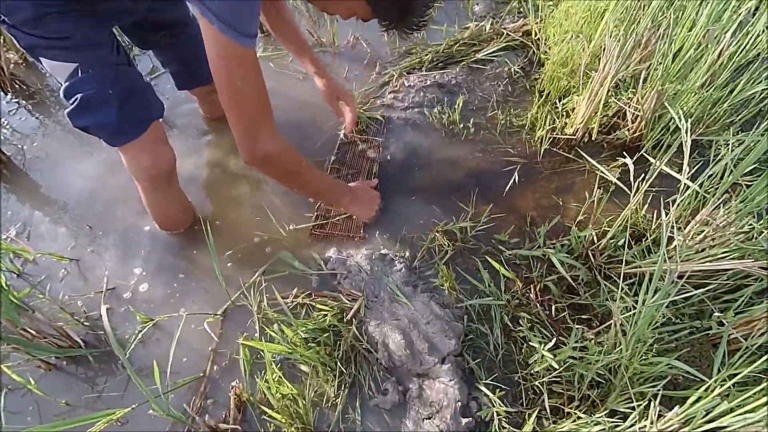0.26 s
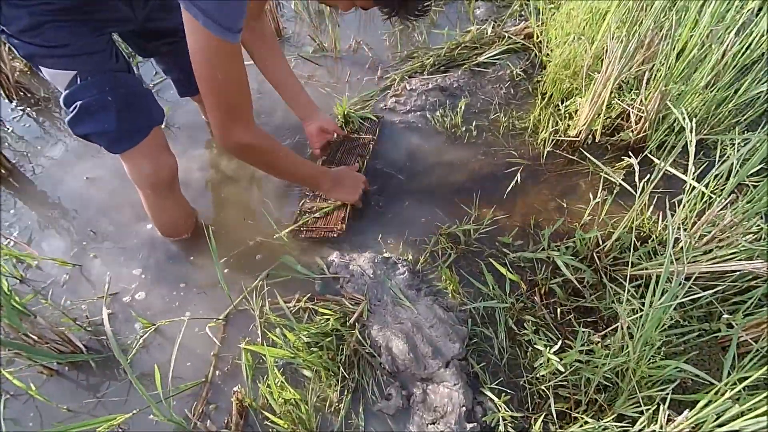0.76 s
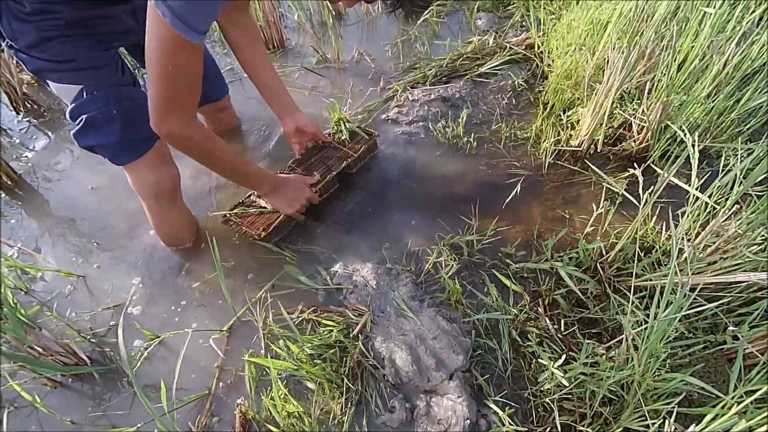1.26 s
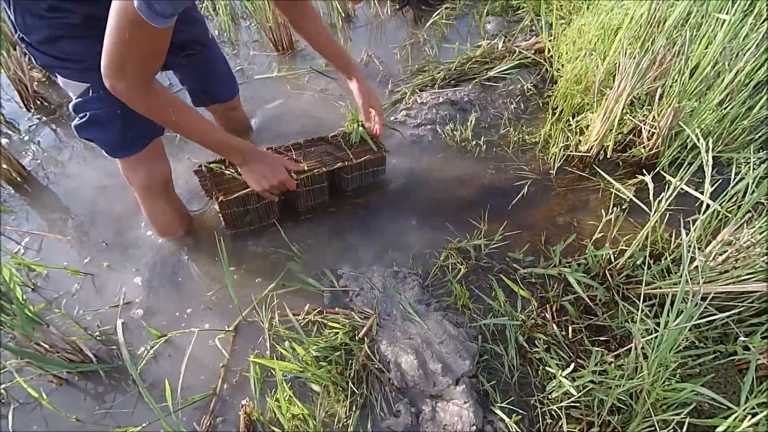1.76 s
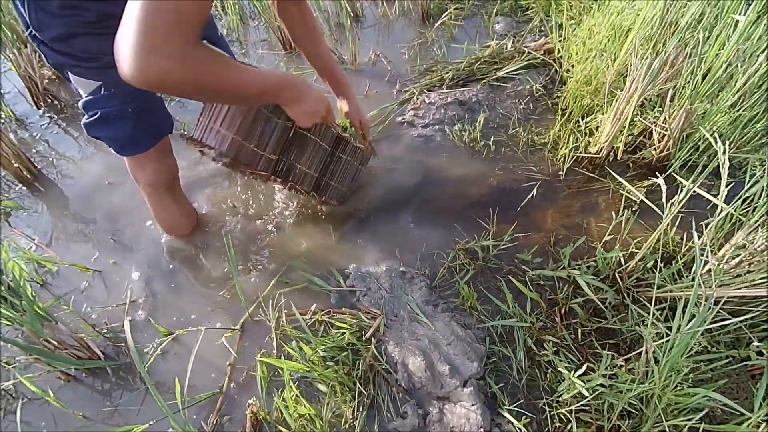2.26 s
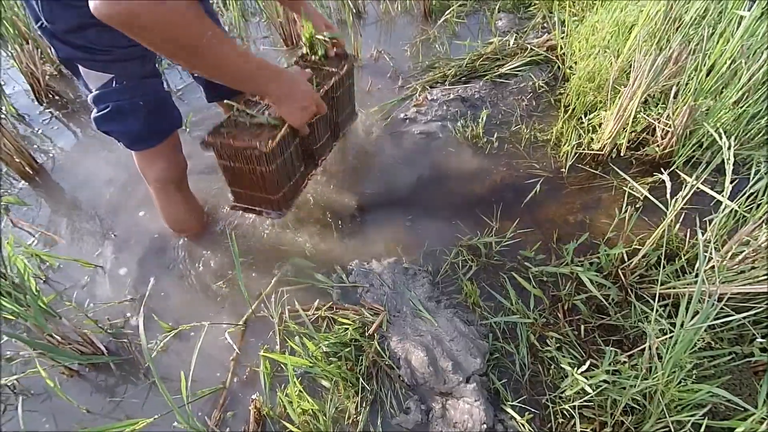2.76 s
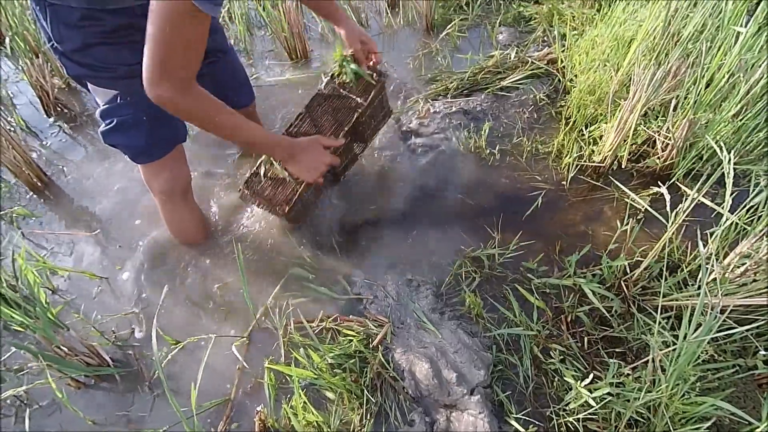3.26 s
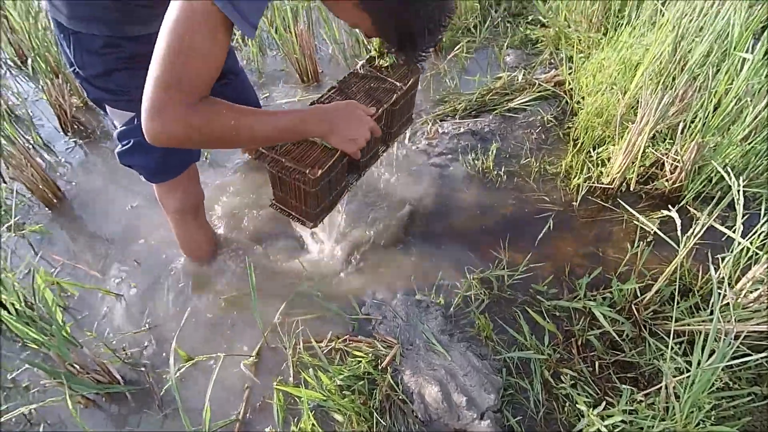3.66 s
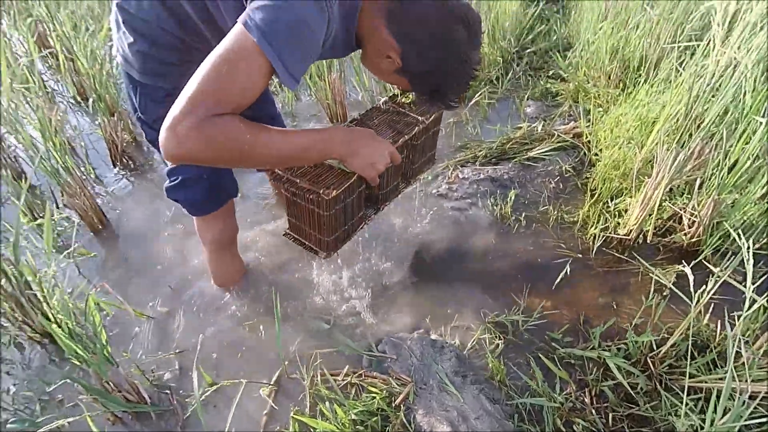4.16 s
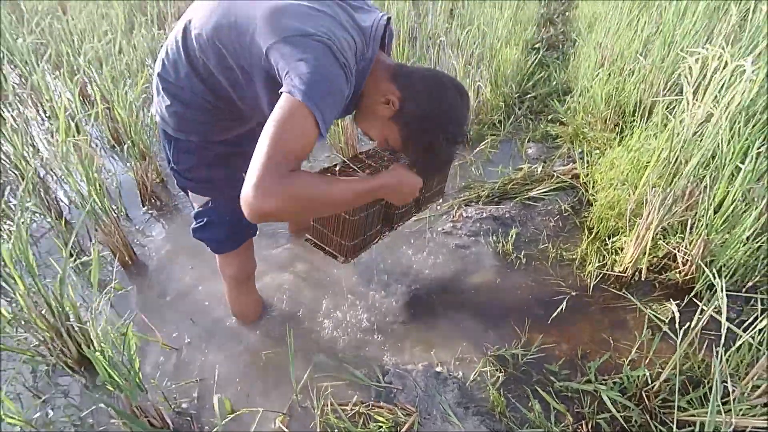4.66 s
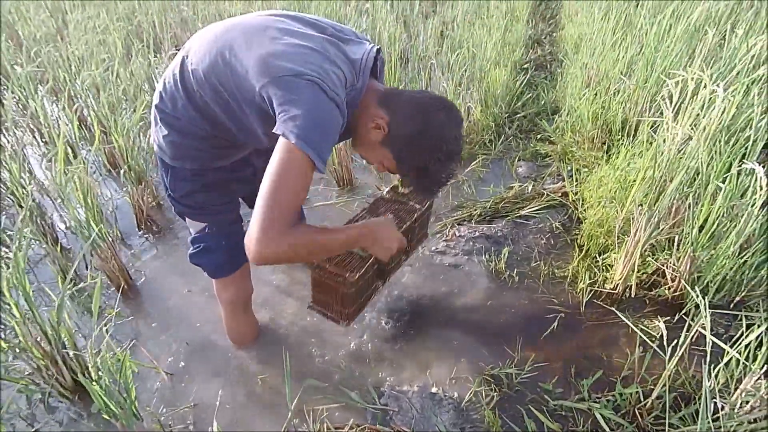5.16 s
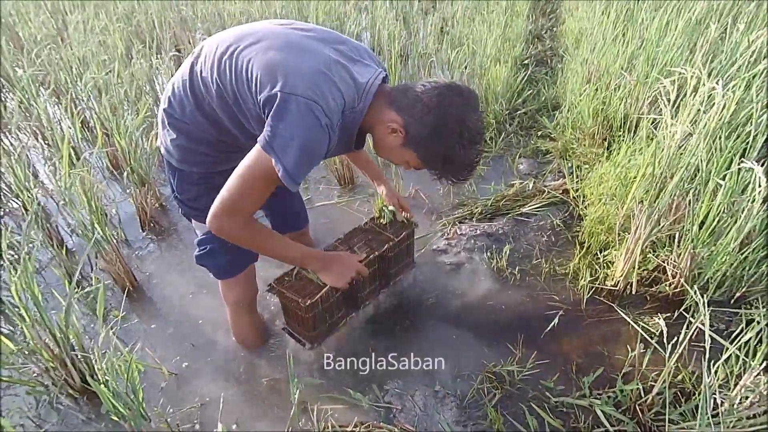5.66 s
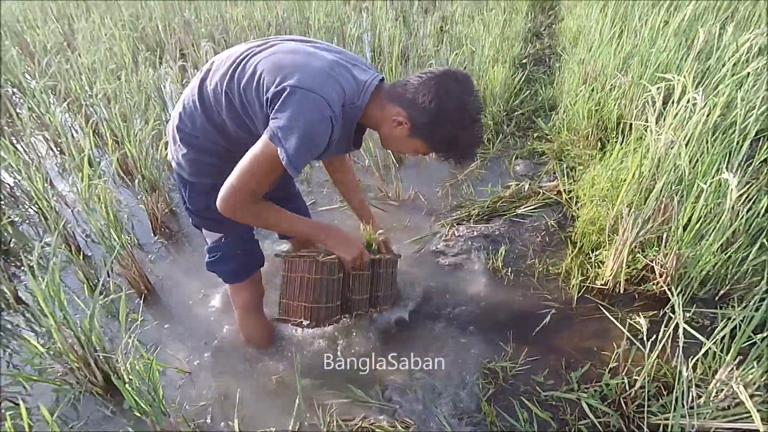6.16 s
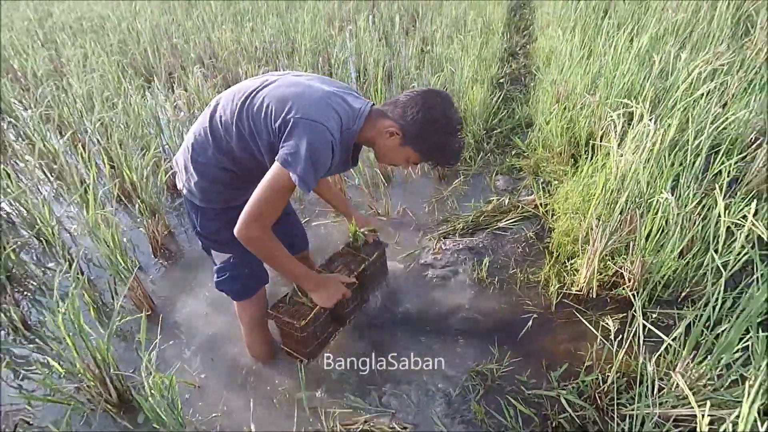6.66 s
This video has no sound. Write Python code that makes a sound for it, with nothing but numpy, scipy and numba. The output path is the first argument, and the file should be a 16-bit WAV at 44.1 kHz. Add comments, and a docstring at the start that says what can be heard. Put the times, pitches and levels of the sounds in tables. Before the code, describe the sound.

Faint insects and hiss lie under lumpy wind rumble on the microphone. Small birds whistle and trill briefly near the start and again just before two seconds. Water then breaks open with a splash, surges at about three seconds, drains in separate hollow drips, and is churned again from five and a half seconds with sharp splashes, plops and gushing, close and dry in an open field.

```python
"""Shallow paddy water: a slatted bamboo trap is lifted out, drains, and is dunked again.
Water gushes, gurgles and drips through the slats: swarms of damped bubble sines over washes of noise.
Wind rumbles on the microphone as low noise; small birds call nearby as gliding sines with faint echoes.
Insects sing faintly over the field as a narrow band of noise above a soft hiss."""
import sys
import numpy as np
from scipy import signal
from scipy.fft import rfft, irfft
from scipy.io import wavfile
from numba import njit

SR = 44100
rng = np.random.default_rng(int(sys.argv[2]) if len(sys.argv) > 2 else 0)


def waveform_to_disk(signal):
    """Save audio, clipped to [-1, 1], as 16-bit WAV at the path in sys.argv[1]."""
    frames = np.transpose(np.atleast_2d(signal))
    scaled = np.clip(frames, -1, 1) * 32767
    samples = np.round(scaled).astype(np.int16)
    wavfile.write(sys.argv[1], SR, samples)


N = 305613


def from_db(db):
    """Decibel law: 20 dB is a tenfold amplitude."""
    return 10 ** (np.asarray(db) / 20)


def rms_one(x):
    """Normalisation of signal power: scale to unit rms."""
    return x / np.sqrt(np.mean(x ** 2) + 1e-20)


def in_time(rows):
    """Linear interpolation: a table's columns at every sample, 40 lower before its first row."""
    times, *columns = np.transpose(rows)
    return [np.interp(np.arange(N) / SR, times, c, left=c[0] - 40) for c in columns]


def at_hz(points, hz):
    """Interpolation of a spectrum's level [dB] along a logarithmic frequency axis."""
    point_hz, point_db = np.array(points).T
    return np.interp(np.log(hz), np.log(point_hz), point_db)


def drift(corner_hz):
    """Low-pass filtered chance: a slow random curve of unit rms, made at SR / 20 by a double pole."""
    pole = np.exp(-40 * np.pi * corner_hz / SR)
    noise = rng.standard_normal(N // 20 + 2002)
    slow = signal.lfilter([1], [1, -2 * pole, pole * pole], noise)[2000:]
    return np.interp(np.arange(N) / 20, np.arange(len(slow)), rms_one(slow))


def butterworth(order, hz, kind, x):
    """Maximally flat filtering of a signal."""
    return signal.sosfilt(signal.butter(order, hz, kind, fs=SR, output="sos"), x)


def coloured(x, spectrum):
    """Spectral shaping: weight each frequency by the spectrum, held above 14.8 kHz; unit rms."""
    hz = np.clip(np.fft.rfftfreq(N, 1 / SR), 1, 14800)
    return rms_one(irfft(rfft(x) * from_db(at_hz(spectrum, hz)), N))


@njit
def add(out, start, hz, height, t60, rise, rate):
    """Bubble resonance: each is a damped sine whose pitch climbs as it nears the surface."""
    # `rise` is the fractional climb in pitch over one t60
    for k in range(len(start)):
        phase, length = 0.0, int(t60[k] * rate * .7)
        for i in range(min(length, len(out) - start[k])):
            age = i / (t60[k] * rate)
            phase += 2 * np.pi * hz[k] * (1 + rise[k] * age) / rate
            decay = np.exp(-6.9 * age)
            onset = min(1.0, .5 * i * hz[k] / rate)   # two cycles to full height
            out[start[k] + i] += height[k] * np.sin(phase) * decay * onset


def swarm(per_s, spectrum, cycles, spread_db, clump_db, rise):
    """Random superposition: clumped bubbles, pitches even in log frequency, few loud; unit rms."""
    draws = rng.random((N, 5))
    clumps = from_db(clump_db * drift(25))
    born = draws[:, 0] < per_s * clumps / clumps.mean() / SR
    _, pitch, size, life, climb = draws[born].T
    low_hz, high_hz = spectrum[0][0], spectrum[-1][0]
    hz = low_hz * (high_hz / low_hz) ** pitch
    t60 = cycles * 1.64 ** (2 * life - 1) / hz
    spreads = np.minimum(-np.log(size + 1e-9), 3.6)   # caps the loudest bubbles
    # short high bubbles must be taller to carry the same power per Hz
    height = from_db(at_hz(spectrum, hz) + spread_db * spreads) * hz
    out = np.zeros(N)
    add(out, np.flatnonzero(born), hz, height, t60, rise * climb, SR)
    return rms_one(out)


def swells(steady_db, start, hold, peak_db, rise, fall):
    """Addition of powers: swells over an underlying level, each rising, holding and falling in dB per second."""
    t = np.arange(0, N + 64, 64)[:, None] / SR
    before = np.clip(start - t, 0, None)
    after = np.clip(t - start - np.abs(hold), 0, None)
    shape_db = peak_db - rise * before - fall * after
    power = np.interp(np.arange(N) / SR, t[:, 0], np.sum(10 ** (shape_db / 10), axis=1))
    return 10 * np.log10(10 ** (steady_db / 10) + power)


# spectrum of the steady hiss: (frequency [Hz], relative level [dB])
HISS_SPECTRUM = [(290, -0.5), (500, -4.5), (685, -7.5), (1810, -14.5), (3340, -17), (9350, -17.5),
                 (15200, -14)]
HISS_DB = -53
INSECT_HZ, INSECT_WIDTH_HZ, INSECT_DB = 9260, 910, -63.5


def field():
    """Band-limited noise: a gently wavering hiss with a faint band of insect song."""
    band_hz = [INSECT_HZ - INSECT_WIDTH_HZ / 2, INSECT_HZ + INSECT_WIDTH_HZ / 2]
    song = butterworth(2, band_hz, "band", rng.standard_normal(N))
    hiss = coloured(rng.standard_normal(N), HISS_SPECTRUM) * from_db(HISS_DB + 1.8 * drift(19))
    return hiss + from_db(INSECT_DB) * rms_one(song)


# breeze on the microphone: (time [s], rumble level [dB])
BREEZE = [(0.0, -42.5), (.6, -45), (1.3, -41), (2.0, -42), (2.6, -42), (3.6, -43.5), (4.5, -41.5),
          (4.9, -44.5), (6.1, -41), (6.93, -49.5)]
# gusts over the breeze: (time of full strength [s], hold [s], peak level [dB])
GUSTS = [(0.323, 0.019, -38.5), (1.507, 0.039, -37), (1.89, 0.015, -53), (2.24, 0.28, -38),
         (2.88, 0.018, -41), (3.167, 0.024, -31), (3.49, 0.017, -37), (4.59, .02, -41), (5.567, 0.016, -52),
         (5.954, 0.024, -35), (6.446, 0.089, -28.5), (6.866, 0.022, -29.5)]
GUST_RISE_DB_PER_S, GUST_FALL_DB_PER_S = 167, 149
# spectrum of the wind noise: (frequency [Hz], relative level [dB])
RUMBLE_SPECTRUM = [(8.8, -73), (15, -16), (70, -0.5), (162, -11.5), (193, -11), (250, -19), (425, -24.5),
                   (700, -57), (1540, -120)]


def wind():
    """Turbulence noise: air eddies on the microphone make a lumpy low rumble."""
    breeze_db = in_time(BREEZE)[0]
    level_db = swells(breeze_db, *np.transpose(GUSTS), GUST_RISE_DB_PER_S, GUST_FALL_DB_PER_S)
    lumps = from_db(2.5 * drift(23.0) + 2.0 * drift(8.7))
    rumble = coloured(rng.standard_normal(N), RUMBLE_SPECTRUM)
    return from_db(level_db) * rms_one(rumble * lumps)


# bird whistles, one list per note: (time [s], pitch [Hz], level [dB])
WHISTLES = [
    [(.27, 3000, -66), (.278, 3280, -55), (.286, 3160, -75), (.293, 2890, -55), (.357, 2810, -53)],
    [(1.743, 3250, -49), (1.756, 2950, -70), (1.79, 2800, -64), (1.83, 2780, -56)],
    [(2.692, 2730, -54), (2.714, 3350, -62), (2.733, 4000, -53), (2.752, 4620, -47.5), (2.795, 4930, -53)],
    [(3.46, 3150, -57), (3.495, 3460, -54), (3.52, 3350, -60)],
    [(.33, 1300, -66), (.63, 1313, -68), (.76, 1340, -69)],
]


def whistles():
    """Frequency modulation: each note is a gliding sine with a weak second harmonic."""
    t, out = np.arange(N) / SR, np.zeros(N)
    for note in WHISTLES:
        s, hz, db = np.transpose(note)
        edge = np.clip(np.minimum(t - s[0], s[-1] - t) / 0.0042, 0, 1)
        phase = 2 * np.pi * np.cumsum(np.interp(t, s, hz) + 40 * drift(193)) / SR
        loudness = from_db(np.interp(t, s, db) + 0.65 * drift(60))
        out += np.sqrt(2) * edge * loudness * (np.sin(phase) + 0.17 * np.sin(2 * phase))
    return out


# bird trills: (start [s], note rate [1/s], first pitch [Hz], last pitch [Hz], length [s],
#   opening chirp above the pitch [Hz], level [dB], second voice [Hz], its relative level [dB], roughness [0-1])
TRILLS = [(0.401, 41, 4670, 4360, 0.11, 1750, -34, 6500, -17.5, 0.1),
          (1.84, 74, 5160, 3660, 0.13, 520, -45, 3480, -8, 0.4)]


def trills():
    """Periodic modulation: quick notes, each opening with a falling chirp, joined by a second voice."""
    t, out = np.arange(N) / SR, np.zeros(N)
    for start, per_s, first_hz, last_hz, length, chirp_hz, db, second_hz, second_db, rough in TRILLS:
        age = np.clip((t - start) / length, 0, 1)
        beat = (t - start) * per_s % 1   # progress through the current note
        fall = chirp_hz * np.exp(-(beat / 0.14) ** 2) - 260 * beat ** 8.6
        hz = first_hz + (last_hz - first_hz) * age + fall + 400 * rough * drift(295)
        phase = 2 * np.pi * np.cumsum(hz) / SR
        tone = np.sin(phase) + 0.16 * np.sin(2 * phase) + 0.063 * np.sin(3 * phase)
        second_phase = 2 * np.pi * np.cumsum(second_hz + 400 * rough * drift(380)) / SR
        second_level = np.clip(age / 0.32, 0, 1) ** 2.5 * from_db(second_db + 4.4 * drift(74))
        tone += second_level * np.sin(second_phase)
        note_swell = np.clip((beat / 0.23) ** 2, .08, 1) * np.clip((1 - beat) / 0.17, 0, 1)
        trill_swell = np.sin(np.pi * age) ** 0.46 * (age < 1)
        out += from_db(db + 1.1 * rough * drift(120)) * trill_swell * note_swell * tone
    return out


def birds():
    """Discrete reflections: the calls return softly from the field's edges."""
    calls = whistles() + trills()
    echo = np.zeros(N)
    for lag_s, db in ((.023, -29), (.041, -18.5), (.066, -21), (.097, -28)):
        lag = round(lag_s * SR)
        echo[lag:] += from_db(db) * calls[:-lag]
    return calls + echo


# single large bubbles from drips and plunges: (time [s], peak level [dB], pitch [Hz], t60 [s])
PLOPS = [(0.51, -25.5, 845, 0.015), (2.108, -38.5, 1150, 0.018), (2.156, -37.5, 1700, 0.018),
         (2.395, -33, 1910, 0.016), (2.535, -18.5, 1460, 0.027), (2.566, -28, 1180, 0.038),
         (2.687, -23, 1360, 0.016), (2.852, -33.5, 805, 0.091), (2.976, -25, 635, 0.052),
         (2.997, -18, 517, 0.03), (3.108, -21.5, 340, 0.052), (3.155, -12, 734, 0.028),
         (3.194, -26, 1136, 0.061), (3.245, -29, 1210, 0.076), (3.648, -27.5, 1640, 0.029),
         (3.698, -32, 870, 0.062), (3.758, -22, 1270, 0.016), (3.779, -29, 1190, 0.026),
         (3.816, -24, 505, 0.035), (3.832, -23.5, 1730, 0.023), (3.886, -28, 861, 0.025),
         (3.909, -32, 2030, 0.03), (4.012, -21, 1040, 0.025), (4.054, -30, 1370, 0.035),
         (4.082, -37, 890, 0.088), (4.146, -24, 1314, 0.049), (4.188, -29, 1500, 0.039),
         (4.222, -31.5, 1730, 0.027), (4.249, -28.5, 1220, 0.057), (4.275, -30.5, 1325, 0.065),
         (4.324, -35.5, 1296, 0.082), (4.466, -31.5, 1340, 0.035), (4.487, -32.5, 2070, 0.026),
         (4.545, -29, 977, 0.075), (4.611, -30, 1930, 0.03), (4.614, -31.5, 1080, 0.037),
         (4.733, -28, 1190, 0.09), (4.861, -33.5, 1580, 0.033), (4.95, -31.5, 1410, 0.046),
         (5.019, -26, 1840, 0.025), (5.197, -25, 1214, 0.05), (5.27, -32.5, 956, 0.036),
         (5.335, -33, 1425, 0.058), (5.484, -24, 810, 0.035), (5.518, -25.5, 620, 0.048),
         (5.539, -16, 398, 0.043), (5.57, -11.5, 790, 0.02), (5.601, -14, 1590, 0.0083),
         (5.85, -27.5, 720, 0.044), (5.962, -20.5, 1390, 0.024), (5.987, -24, 410, 0.1),
         (6.236, -22, 1310, 0.031), (6.348, -19.5, 356, 0.033), (6.359, -11, 1290, 0.019),
         (6.399, -18, 1180, 0.024), (6.438, -24, 980, 0.028), (6.455, -21.5, 1270, 0.048),
         (6.511, -26, 1336, 0.077), (6.911, -26.5, 920, 0.027)]


def plops():
    """Bubble resonance: each plop is a damped sine, climbing a little, begun by the drop's contact click."""
    out, impacts = np.zeros(N), np.zeros(N)
    s, db, hz, t60 = np.transpose(PLOPS)
    start = (s * SR).astype(int)
    add(out, start, hz, from_db(db), np.clip(t60, .005, .15), 0.21 * rng.random(len(s)), SR)
    impacts[start] = from_db(db - 2)
    return out + butterworth(1, [600, 4000], "band", impacts + 1e-18)


# spectrum of tiny bubbles and droplets: (frequency [Hz], relative level [dB])
SPRAY_SPECTRUM = [(1530, -9), (2750, -12.5), (3550, 0), (4530, -2.5), (4980, 1), (6690, -3.5), (8110, -5),
                  (12700, -0.5), (15200, -9)]


def spray_noise():
    """Random superposition at high density: countless tiny droplets merge into coloured noise."""
    return coloured(rng.standard_normal(N), SPRAY_SPECTRUM)


# droplets smacking the surface: (time [s], level before the ring and puff offsets [dB], centre [Hz])
SMACKS = [(2.4306, -22, 8750), (2.567, -23, 8940), (2.6434, -30, 12100), (2.9994, -28, 4400),
          (3.027, -22, 10000), (3.1534, -30, 4780), (3.2544, -25, 4800), (3.756, -30.5, 8900),
          (4.03, -26.5, 8900), (4.069, -33, 12400), (4.179, -36, 11200), (4.3335, -32.5, 5150),
          (4.682, -35, 8300), (5.1353, -35.5, 4170), (5.225, -35, 6000), (5.4584, -20.5, 11400),
          (5.536, -18, 12100), (5.569, -17, 7130), (5.5997, -21.5, 6700), (5.65, -22, 11300),
          (5.658, -27.5, 3820), (5.883, -16.5, 12900), (6.07, -35, 5500), (6.2359, -28, 6640),
          (6.327, -22, 6200), (6.3363, -10, 6330), (6.917, -24, 8800)]


def smacks():
    """Impact excitation: each droplet gives a short ring inside a decaying puff of spray noise."""
    out, clicks = np.zeros(N), np.zeros(N)
    s, db, hz = np.transpose(SMACKS)
    start = (s * SR).astype(int)
    add(out, start, hz, from_db(db + 4.0), 61.0 / hz, np.zeros(len(s)), SR)
    clicks[start] = from_db(db - 5.5)
    puff = signal.lfilter([1], [1, -np.exp(-1 / (0.0033 * SR))], clicks)
    puff = signal.lfilter([.025], [1, -.975], puff)   # the puff swells over a millisecond
    return out + puff * spray_noise()


# underlying water flow: draining through the slats, with a last sudden splash at 6.88 s:
#   (time [s], gurgle level [dB], spray level before mixing [dB], share of separate drips [0-1])
UNDERLYING_FLOW = [(2.0, -75, -83, 0.3), (2.14, -56, -55.5, 0.33), (2.38, -56, -47.5, 0.68),
                   (2.46, -46.5, -51, 0.43), (2.9, -42, -48, 0.43), (3.4, -44, -46, 0.28),
                   (4.1, -53, -46.5, 0.67), (4.7, -55.5, -54, 1), (5.42, -71, -52.5, 0.74),
                   (5.5, -49, -60, 0.79), (6.2, -44, -39, 0.05), (6.55, -46, -45, 0.34),
                   (6.868, -48, -52, 0), (6.878, -40.5, -37, 0.06), (6.93, -47, -38.5, 0.23)]
# surges as the trap is heaved, dunked or tipped:
#   (time of full strength [s], hold [s], gurgle level [dB], spray level before mixing [dB])
SURGES = [(2.438, 0.014, -42.5, -36.5), (2.525, 0.048, -38, -39.5), (3.01, 0.11, -42, -33.5),
          (3.145, 0.021, -30, -25.5), (3.207, 0.054, -35, -34), (3.771, .15, -41, -41.5),
          (3.999, 0.021, -37.5, -48), (4.514, 0.051, -43.5, -45), (5.19, 0.088, -47, -48.5),
          (5.488, 0.0077, -44, -36.5), (5.547, 0.034, -29.5, -31), (5.632, 0.11, -37.5, -42),
          (5.886, 0.019, -32.5, -27.5), (5.958, 0.12, -35.5, -36.5), (6.242, 0.041, -37.5, -37),
          (6.321, 0.057, -38.5, -34), (6.443, 0.031, -31.5, -31.5)]
SURGE_RISE_DB_PER_S, SURGE_FALL_DB_PER_S = 298, 238
SURGE_MERGES_DRIPS = 0.011   # drip share lost per dB that a surge lifts the spray above the underlying flow


def flow():
    """Addition of powers: surges over the underlying flow set gurgle and spray dB, and merge the drips."""
    base_gurgle_db, base_spray_db, drip = in_time(UNDERLYING_FLOW)
    s, hold, gurgle_peak_db, spray_peak_db = np.transpose(SURGES)
    gurgle_db = swells(base_gurgle_db, s, hold, gurgle_peak_db, SURGE_RISE_DB_PER_S, SURGE_FALL_DB_PER_S)
    spray_db = swells(base_spray_db, s, hold, spray_peak_db, SURGE_RISE_DB_PER_S, SURGE_FALL_DB_PER_S)
    return gurgle_db, spray_db, np.clip(drip - SURGE_MERGES_DRIPS * (spray_db - base_spray_db), 0, 1)


def slosh(gurgle_db):
    """Large-cavity resonance: only a strong flow traps big air pockets, so the level rises steeply."""
    spectrum = [(200, -5.0), (350, -1.0), (600, -5.0)]
    pockets = swarm(130, spectrum, cycles=31.0, spread_db=3.0, clump_db=3.0, rise=0.61)
    return from_db(-35.5 + 2.6 * (gurgle_db + 31.5)) * pockets


# spectrum of the larger bubbles: (frequency [Hz], relative level [dB per Hz])
GURGLE_SPECTRUM = [(290, -40), (500, -8), (1030, -5), (1280, -1.5), (1720, -8), (2110, -12), (2510, -23.5),
                   (3000, -21.5), (3900, -75), (6600, -120)]


def gurgle(drip, stutter, grains):
    """Bubble resonance: larger bubbles ring singly in drips and merge into a low wash in a gush."""
    bubbles = swarm(420, GURGLE_SPECTRUM, cycles=42.0, spread_db=3.5, clump_db=2.0, rise=0.19)
    bubbles = butterworth(4, 2300, "low", bubbles)
    wash = coloured(rng.standard_normal(N), GURGLE_SPECTRUM)
    wash_db = -14 * drip + 2.8 * stutter + 3.44 * drift(53)
    return grains * bubbles + wash * from_db(wash_db)


FULLER_FROM_S, FULLER_MIDDLE_DB = 5.48, 1   # from here the spray wash is slightly fuller around 5 to 8 kHz


def spray_wash():
    """Independent band modulation: large, middle and small drop sizes come and go separately."""
    fine = spray_noise()
    large, coarse = (signal.sosfiltfilt(signal.butter(3, hz, fs=SR, output="sos"), fine)
                     for hz in (5200, 8200))
    middle_db = FULLER_MIDDLE_DB * (np.arange(N) / SR > FULLER_FROM_S)
    sizes = large, (coarse - large) * from_db(middle_db), fine - coarse
    return sum(size * from_db(2.36 * drift(18.4) + 1.9 * drift(59)) for size in sizes)


def spray(drip, stutter, grains):
    """Small-bubble resonance: tiny bubbles and droplet ticks merge into a high wash in a gush."""
    # tiny bubbles hardly climb in pitch
    bubbles = swarm(500, SPRAY_SPECTRUM, cycles=74.0, spread_db=5.0, clump_db=5.0, rise=0.12)
    ticks = swarm(550, SPRAY_SPECTRUM, cycles=5.1, spread_db=4.5, clump_db=6.0, rise=0.04)
    ticks = butterworth(4, 3300, "high", ticks)
    wash_db = -7 * drip + 7.4 * stutter + 2.14 * drift(110)
    return grains * (bubbles + from_db(-0.5) * ticks) + spray_wash() * from_db(wash_db)


def water():
    """Superposition of bubble sizes: one flow drives gurgle, spray and a deep slosh."""
    gurgle_db, spray_db, drip = flow()
    stutter = np.tanh(drift(24.0)) * np.clip(0.35 + drip, 0, 1)   # thin flow stutters, a gush runs on
    grains = from_db(-7.0 + 9.7 * drip)   # single bubbles stand out in drips
    return (from_db(gurgle_db) * gurgle(drip, stutter, grains)
            + from_db(spray_db - 3.5) * spray(drip, stutter, grains)
            + slosh(gurgle_db))


def scene():
    """Linear superposition: all sources sum at one microphone."""
    return (field() + wind() + birds() + plops() + smacks() + water())[None]


# brief dips of the whole sound: (time [s], length [s], depth [dB])
DIPS = [(2.424, 0.0062, -13.5), (2.55, 0.013, -17.5), (3.169, 0.0028, -9), (5.45, 0.0084, -14),
        (5.466, 0.013, -15.5), (5.839, 0.0062, -8.5), (5.967, 0.0037, -15), (5.977, 0.0068, -20),
        (6.051, 0.0088, -16.5), (6.291, 0.0062, -19.5), (6.33, 0.0076, -16)]
CUTOFF_HZ = 15750   # 80 dB down from here up


def record(dry):
    """Amplitude modulation and low-pass filtering: the level dips briefly, then the top is cut."""
    t, gain_db = np.arange(N) / SR, np.zeros(N)
    for s, length, db in DIPS:
        gain_db += db * np.clip(np.minimum(t - s, s + length - t) / 0.0018 + 1, 0, 1)
    low_pass = signal.cheby2(22, 80, CUTOFF_HZ, fs=SR, output="sos")
    return signal.sosfilt(low_pass, dry * from_db(gain_db))


dry = scene()
out = record(dry)
waveform_to_disk(out)
```